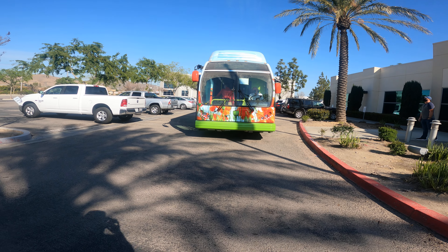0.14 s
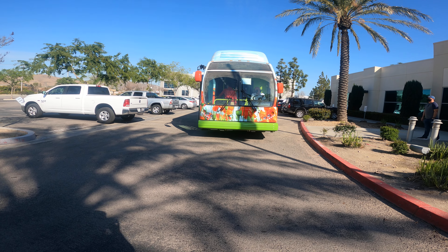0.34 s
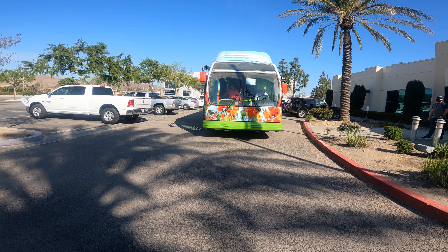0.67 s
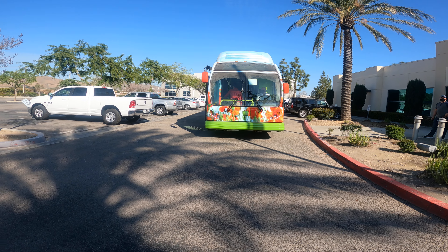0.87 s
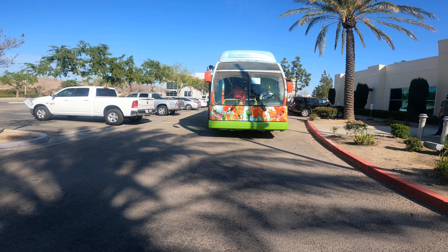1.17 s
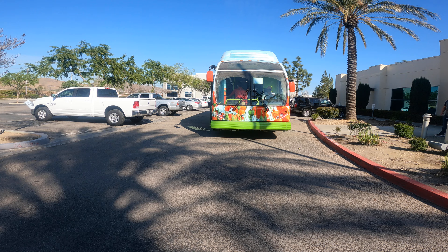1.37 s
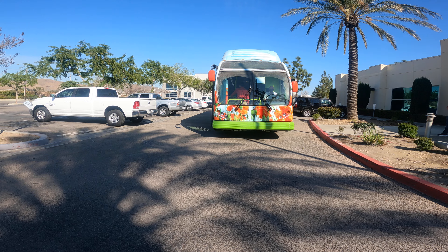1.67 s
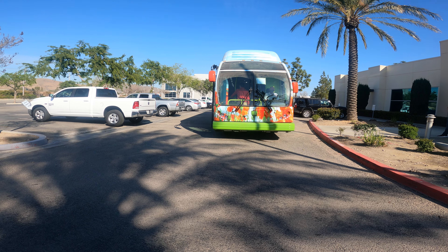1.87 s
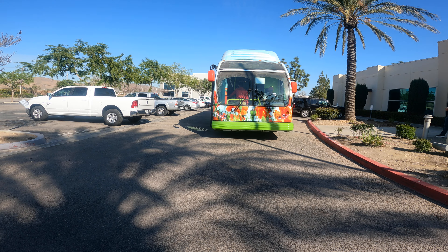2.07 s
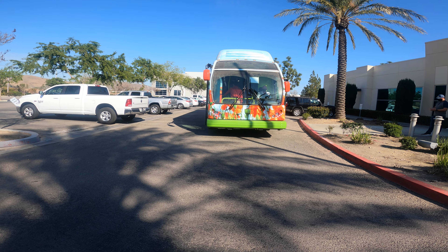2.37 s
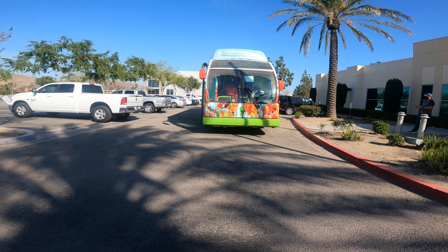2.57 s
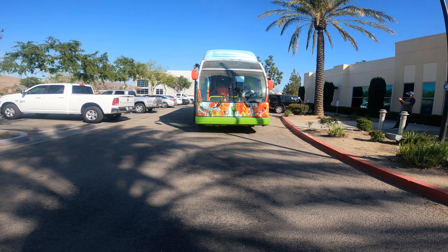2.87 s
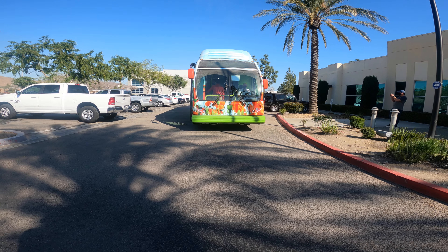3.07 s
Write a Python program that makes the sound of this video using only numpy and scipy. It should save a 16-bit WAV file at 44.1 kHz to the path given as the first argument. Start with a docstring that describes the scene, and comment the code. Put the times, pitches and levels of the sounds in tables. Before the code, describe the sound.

A bus idles in an open parking lot, heard from some way in front. A deep hum drops away by about 0.5 s, leaving low, slightly uneven throbs, about nine per second, until the end at 3.2 s. Rumble, faint whines and distant traffic lie beneath. Short grainy hisses, mostly left, cluster at 0.3-1 s, recurring near 1.5 and after 2.6 s; light clicks come at 0.8, 1.9 and 2.5-2.9 s.

```python
"""A low drone soon drops away under a throb that starts almost at once, about nine times a second:
a bus waits in an open parking lot, heard from some way in front. Wavering tones make its drone and
faint whines, rising sweeps its throbs, and filtered noise its boom and pulsing hiss over distant
traffic. Short hisses, mostly on the left, are swells of noise; light clicks are tiny ringing bursts."""
import sys
import numpy as np
from scipy import signal
from scipy.fft import rfft, irfft
from scipy.io import wavfile

SR = 44100
rng = np.random.default_rng(int(sys.argv[2]) if len(sys.argv) > 2 else 0)


def dump(signal):
    """Clip the signal to [-1, 1] and save it as 16-bit WAV at the path in sys.argv[1]."""
    limited = np.clip(np.atleast_2d(signal).T, -1, 1)
    pcm = np.round(limited * 32767).astype(np.int16)
    wavfile.write(sys.argv[1], SR, pcm)


N = 142443  # length in samples
T = np.arange(N) / SR  # time of every sample, s
HZ = np.fft.rfftfreq(N, 1 / SR)  # frequency of every spectrum bin


def amp(db):
    """Turns decibels into a plain gain."""
    return 10 ** (np.asarray(db) / 20)


def unit(x):
    """Scales to an rms (average strength) of 1."""
    return x / np.sqrt(np.mean(x ** 2) + 1e-20)


def curve(points):
    """Joins (time, value) points with straight lines."""
    return np.interp(T, *np.transpose(points))


def spectrum(points):
    """Joins (frequency, value) points on a log-frequency axis."""
    hz, value = np.transpose(points)
    return np.interp(np.log(HZ + 1), np.log(hz + 1), value)


def octaves(hz):
    """Distance of every frequency from hz, in octaves."""
    return np.log2((HZ + 1) / hz)


def pan(db):
    """Left and right gains of constant power; positive leans left."""
    return unit(amp([[db / 2], [-db / 2]]))


def drift(hz):
    """Random wandering, mostly slower than the given rate."""
    random_spectrum = rfft(rng.standard_normal(N))
    return unit(irfft(random_spectrum / (1 + (HZ / hz) ** 4), N))


# How alike left and right are: (frequency [Hz], likeness [0 to 1])
LEFT_RIGHT_LIKENESS = [(20,0.95),(100,1),(250,0.99),(500,0.92),(1000,0.62),(2500,0.62),(5000,.5),(12000,0.28)]


def noise(colour_db):
    """Coloured noise at two microphones, most alike in the bass."""
    a, b = rfft(rng.standard_normal((2, N)))
    same = np.clip(spectrum(LEFT_RIGHT_LIKENESS), 0, 1)
    mid = a * np.sqrt(1 + same)
    side = b * np.sqrt(1 - same)
    stereo = np.array([mid + side, mid - side])
    return unit(irfft(stereo * amp(colour_db), N))


def tone(hz, wander_hz, flutter_db, rate):
    """A machine tone: a sine that wavers in pitch and level, up to about rate times a second."""
    turns = np.cumsum(hz + wander_hz * drift(rate)) / SR + rng.random()
    return unit(np.sin(2 * np.pi * turns) * amp(flutter_db * drift(rate)))


DRONE_HZ = 73.2
# Loudness of the drone before its flutter: (time [s], level [dB])
DRONE_LEVEL = [(0,-18),(.15,-19),(.27,-26.5),(.35,-22),(.43,-24),(.48,-34.5),(.7,-40.5),(.78,-23.5),(.9,-39),(1.4,-40.5),(2.3,-43),(2.85,-35),(3.23,-29.5)]
# Overtones of the drone: (multiple of its pitch [times], relative level [dB])
DRONE_OVERTONES = [(1,-2),(3,-18.5),(4,-26),(6,-38)]


def drone(wander_hz=.8, flutter_db=0.2):
    """A deep hum of sines at whole multiples of one wavering pitch; it drops away early on."""
    turns = np.cumsum(DRONE_HZ + wander_hz * drift(13)) / SR
    hum = np.zeros(N)
    for multiple, db in DRONE_OVERTONES:
        hum += amp(db) * np.sin(2 * np.pi * (round(multiple) * turns + rng.random()))
    return amp(curve(DRONE_LEVEL) + flutter_db * drift(36)) * unit(hum)


BOOM_HZ, BOOM_OCTAVES = 158.3, .22  # centre and width of its resonance
# Loudness of the uneven boom: (time [s], level [dB])
BOOM_LEVEL = [(0,-43.5),(.55,-40),(.8,-39.5),(1.7,-37),(2.3,-41),(2.7,-40),(2.9,-35),(3.23,-32.5)]


def boom():
    """Continuous uneven rumble beneath the throbs: noise caught in one broad low resonance."""
    colour = -20 * np.log10(1 + (octaves(BOOM_HZ) / BOOM_OCTAVES) ** 4)
    return amp(curve(BOOM_LEVEL)) * noise(colour)


WHINE_HZ = 690
# Loudness of the main whine: (time [s], level [dB])
WHINE_LEVEL = [(0,-61),(.5,-59),(1.2,-64.5),(2.15,-70),(2.3,-57),(2.55,-61),(2.7,-56.5),(3.03,-56),(3.11,-52),(3.23,-49)]
# A second whine, stronger at first, that mostly sinks in pitch and fades after an early rise:
# (time [s], pitch [Hz], level [dB])
SECOND_WHINE = [(0,615.6,-57),(0.449,599,-52.5),(.9,578.3,-64),(1.4,555.5,-69.5),(3.23,568,-86.5)]
# Faint steady motor tones: (pitch [Hz], level [dB], left over right [dB])
MOTOR_LINES = [(26.6,-43.5,-2),(336,-57,4.5),(349.7,-55.5,3),(1397,-67,0),(2496,-72.5,-4),(2553,-71,-4),(2607,-73.5,-6),(2637,-70,-4),(2840,-74.5,-0.5),(2840,-77,6.5),(5400,-79.5,-0.5)]


def motors():
    """Two whines and several steady lines, each a sine whose pitch wavers a little."""
    whine = amp(curve(WHINE_LEVEL)) * tone(WHINE_HZ, wander_hz=2.5, flutter_db=0, rate=20)
    time, pitch, level = np.transpose(SECOND_WHINE)
    second_tone = tone(np.interp(T, time, pitch), wander_hz=10, flutter_db=1, rate=30)
    second_whine = amp(np.interp(T, time, level)) * second_tone
    lines = np.zeros((2, N))
    for hz, db, side in MOTOR_LINES:
        lines += amp(db) * pan(side) * tone(hz, wander_hz=1.48, flutter_db=2.5, rate=6.3)
    return whine + second_whine + lines


FIZZ_HZ = 65.5  # pulses per second, before a slight drift
# Colour of the pulsing hiss: (frequency [Hz], relative level [dB])
FIZZ_COLOUR = [(20,-55),(1500,-11),(2600,2),(4000,-16),(5500,-1),(5850,-10),(6400,0.5),(6800,0.5),(7200,-10.5),(8200,-15.5),(9500,-23),(16000,-55)]
# Loudness of the pulsing hiss: (time [s], level [dB])
FIZZ_LEVEL = [(0,-69.5),(1.8,-67.5),(2.0,-61),(2.5,-59),(2.95,-60),(3.23,-65.5)]


def fizz(sharp=0.53, pan_db=5):
    """High hiss let out once per turn of a motor, as noise that swells with each turn."""
    turns = np.cumsum(FIZZ_HZ + 0.4 * drift(3.7)) / SR
    pulse = np.exp(sharp * np.cos(2 * np.pi * turns))
    pulsing_hiss = unit(noise(spectrum(FIZZ_COLOUR)) * pulse)
    return amp(curve(FIZZ_LEVEL)) * pan(pan_db) * pulsing_hiss


# Colour of the far road: (frequency [Hz], relative level [dB])
ROAD_COLOUR = [(20,-10),(200,1.5),(400,-0.5),(800,-4),(1000,-4),(1300,-6.5),(2300,-14),(2750,-15),(3300,-21),(4500,-21.5),(6800,-31),(8000,-34),(9200,-54),(12000,-65),(16000,-90.5)]
# Loudness of the far road before its random swell: (time [s], level [dB])
ROAD_LEVEL = [(0,-47.5),(.5,-48.5),(1.2,-48),(1.9,-48),(2.4,-45.5),(2.85,-47),(3.05,-46),(3.23,-47.5)]
RUMBLE_DB = -30
# Colour of the steady low rumble: (frequency [Hz], relative level [dB])
RUMBLE_COLOUR = [(10,-25),(50,-4),(80,-3),(103,-7.5),(125,-1.5),(190,-5.5),(240,-14.5),(295,-17),(360,-29.5),(600,-39.5),(2000,-76)]
# Colour of the deepest rumble: (frequency [Hz], relative level [dB])
DEEP_COLOUR = [(8,-25.5),(27,-5.5),(38,-3.5),(50,5),(70,0.5),(88,8),(103,-4),(130,-21.5),(400,-81)]
# Loudness of the deepest rumble: (time [s], level [dB])
DEEP_LEVEL = [(0,-46.5),(.6,-42),(.8,-29.5),(1.1,-32),(1.42,-32.5),(1.6,-26.5),(1.9,-41),(2.2,-36),(2.65,-30.5),(2.9,-31.5),(3.23,-39)]


def traffic(swell_db=1.35, pan_db=1.9):
    """The far wash of the road and two low rumbles, all coloured noise."""
    road_gain = amp(curve(ROAD_LEVEL) + swell_db * drift(4.7))
    wash = noise(spectrum(ROAD_COLOUR)) * road_gain * pan(pan_db)
    rumble = amp(RUMBLE_DB) * noise(spectrum(RUMBLE_COLOUR))
    deep = amp(curve(DEEP_LEVEL)) * noise(spectrum(DEEP_COLOUR))
    return wash + rumble + deep


AIR_HZ = 10000  # the air lift works above this
# Short hisses: (start time [s], length [s], rise [s], fall [s], level before swell and grain [dB],
# left over right [dB], emphasis [Hz], emphasis lift [dB], air lift [dB])
SHORT_HISSES = [(0.031,0.049,0.029,0.018,-57.5,-2,7100,-1,8),(0.253,0.17,0.078,0.028,-59,15,7600,17,10),(0.331,0.14,0.055,.02,-58.5,12,4220,17,5),(0.393,0.094,0.021,0.03,-45.5,11,6500,1,-4),(0.46,0.086,0.011,0.021,-52,12,4770,11,8),(0.666,0.2,0.034,0.11,-59,4,4200,15,-11),(0.803,0.057,0.017,0.029,-56.5,13,4700,12,-1),(0.864,0.14,0.035,0.054,-45,12.5,5930,1.5,-7),(0.891,0.096,0.047,0.013,-45.5,9,2600,2.5,5),(1.103,0.075,.02,0.064,-53.5,-7,3450,4,-12),(1.433,0.029,0.0105,0.022,-56,3.5,5400,6,-7),(1.468,0.08,0.017,0.068,-46,18,5000,1,-11),(2.62,0.12,0.02,0.037,-52,8,1700,16,0),(2.798,0.36,0.039,0.11,-60.5,9,1800,15.5,9.5)]
# Colour shared by the hisses: (frequency [Hz], relative level [dB])
HISS_COLOUR = [(20,-31),(400,13.5),(1200,0.5),(3000,1),(4600,-6),(6200,-2),(7800,-10),(9500,-21.5),(12000,-24),(15000,-30.5),(17000,-53)]
# Resonances in every hiss before their shift: (frequency [Hz], width [octaves], lift [dB])
HISS_RESONANCES = [(1730,0.064,1.5),(2540,.08,-1.5),(3500,0.23,2.5),(4450,.1,-0.5),(5660,.06,1),(7850,.05,1.5)]


def hisses(grain_db=1.5, width=0.41, peak_shift=.04):
    """Short, grainy swells of noise close to the microphone; resonances shift from one to the next."""
    out = np.zeros((2, N))
    air = 1 / (1 + (AIR_HZ / (HZ + 1)) ** 12)
    for start, length, rise, fall, db, side, hz, lift_db, air_db in SHORT_HISSES:
        shape = np.clip(np.minimum((T - start) / rise, (start + length - T) / fall), 0, 1)
        shift = 1 + peak_shift * rng.uniform(-1, 1)
        colour = spectrum(HISS_COLOUR) + air_db * air
        colour += lift_db * np.exp(-(octaves(hz) / width) ** 2)
        for peak_hz, peak_width, peak_db in HISS_RESONANCES:
            colour += peak_db * np.exp(-(octaves(peak_hz * shift) / peak_width) ** 2)
        out += amp(db + grain_db * drift(180)) * pan(side) * shape * noise(colour)
    return out


# Low throbs, perhaps from the bus's compressor: (time [s], relative level [dB])
THROB_TIMES = [(.103,-20.5),(0.213,-28),(.329,-41),(0.427,-20),(0.534,-23.5),(0.637,-37.5),(0.744,-18),(0.853,-20.5),(0.956,-18),(1.06,-19.5),(1.173,-21.5),(1.28,-19.5),(1.393,-25),(1.5,-18.5),(1.614,-25),(1.719,-18),(1.828,-18.5),(1.939,-23),(2.046,-18.5),(2.157,-19.5),(2.262,-22.5),(2.38,-20),(2.491,-21.5),(2.595,-17.5),(2.703,-29.5),(2.808,-18.5),(2.918,-16),(3.027,-20.5),(3.136,-18)]
# Sweeps in every throb, before random changes: (offset [s], middle pitch [Hz], climb [octaves/s],
# time from middle to 1/e of its height [s], relative level [dB])
THROB_SWEEPS = [(0,166,20,0.02,-.5),(-.04,146,15.85,0.016,-3),(.013,275,18,.012,-15),(-0.0616,79.8,20.04,0.0086,-9)]


def throbs(level_db=-0.32, scatter=0.031, loose=0.1199):
    """Each throb is a few short low sweeps that rise in pitch, never spaced or sloped quite alike."""
    out = np.zeros(N)
    for time, db in THROB_TIMES:
        near = abs(T - time) < .15  # only work on samples around this throb
        for offset, hz, climb, half, part_db in THROB_SWEEPS:
            tune, spacing, slope = rng.standard_normal(3)
            t = T[near] - time - offset * (1 + loose * spacing)
            pitch = hz * (1 + scatter * tune) * 2 ** (climb * (1 + loose * slope) * t)
            turns = np.cumsum(pitch) / SR + rng.random()
            swell = np.exp(-(t / half) ** 2)
            out[near] += amp(db + part_db) * swell * np.sin(2 * np.pi * turns)
    return amp(level_db) * out


CLICK_TOP_HZ = 7140  # clicks lose their treble above this
# Light clicks and knocks: (time [s], relative level [dB], resonance [Hz], resonance width [Hz],
# burst decay to 1/e [s])
LIGHT_CLICKS = [(0.816,-29,620,550,0.0021),(1.9113,-39,2560,5000,0.0018),(2.512,-54,5860,2500,0.0014),(2.674,-40,2500,6000,0.0014),(2.6788,-32,1100,1500,0.0013),(2.708,-49,5500,7000,.0007),(2.7149,-38,2880,1500,0.00086),(2.7198,-38.5,3170,1200,0.0017),(2.8025,-33,750,600,0.0022),(2.867,-43,1700,1200,0.003),(2.873,-47.5,2400,3000,0.0014)]


def clicks(pan_db=4.0, spread=1.0, snap=2.9):
    """A sharp snap and a tiny burst that dies within milliseconds, each through one broad resonance."""
    out = np.zeros((2, N))
    for time, db, hz, width, decay in LIGHT_CLICKS:
        shape = (T >= time) * np.exp(-abs(T - time) / decay)
        # one noise shared by both sides, plus a separate one for each
        burst = unit(rng.standard_normal(N) + spread * rng.standard_normal((2, N))) * shape
        burst[:, round(time * SR)] += snap
        resonance = 1j * HZ * width / (hz ** 2 - HZ ** 2 + 1j * HZ * width)
        treble_loss = (1 + (HZ / CLICK_TOP_HZ) ** 6) * (1 + (HZ / (3 * hz)) ** 2)
        ringing = unit(irfft(rfft(burst) * resonance / treble_loss, N))
        out += amp(db) * np.sqrt(np.mean(shape ** 2)) * ringing
    return out * pan(pan_db)


def scene(bass_pan_db=1.0):
    """Everything in the lot; all but the hisses and clicks reaches the right side first."""
    background = drone() + boom() + motors() + fizz() + traffic() + throbs() * pan(bass_pan_db)
    background[0] = np.interp(T - 2 / SR, T, background[0])  # left is two samples late
    return background + hisses() + clicks()


EDGE_HZ = 15700  # middle of the filter's cut-off


def record(dry):
    """The recorder's band limit: a low-pass filter that removes the very top of the treble."""
    # mirrored ends give the filter something to work on at the edges
    padded = np.pad(dry, ((0, 0), (255, 255)), "reflect", reflect_type="odd")
    low_pass = signal.firwin(511, EDGE_HZ, window=("kaiser", 9), fs=SR)
    return signal.oaconvolve(padded, low_pass[None], "valid")


dry = scene()
out = record(dry)
dump(out)
```